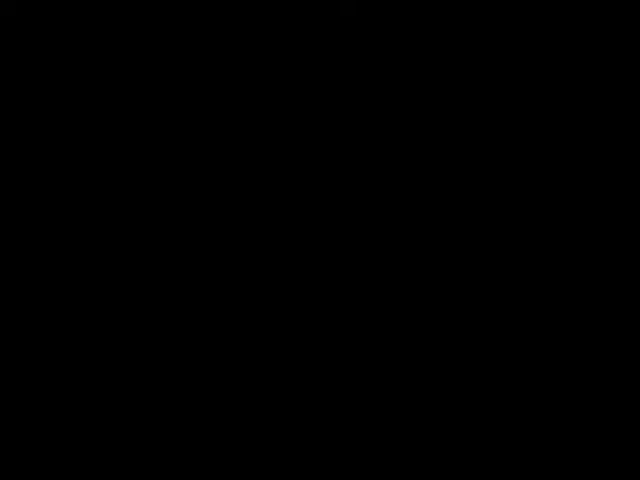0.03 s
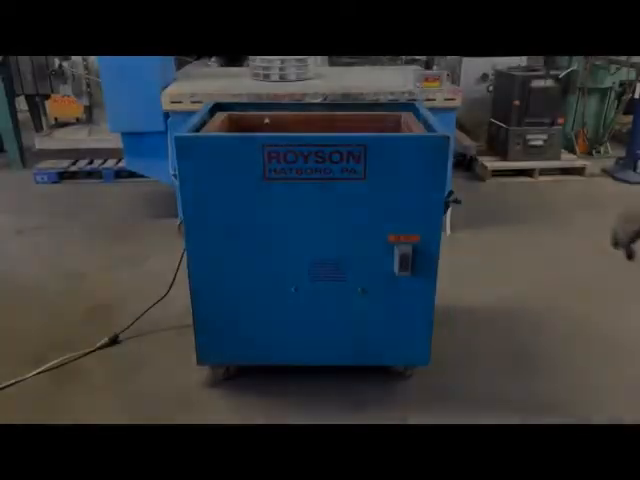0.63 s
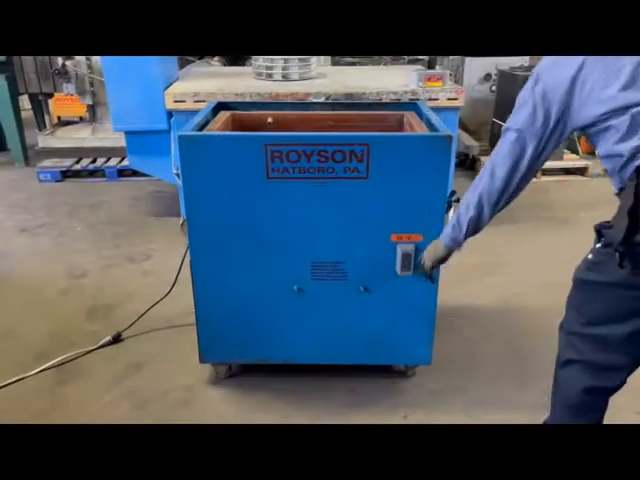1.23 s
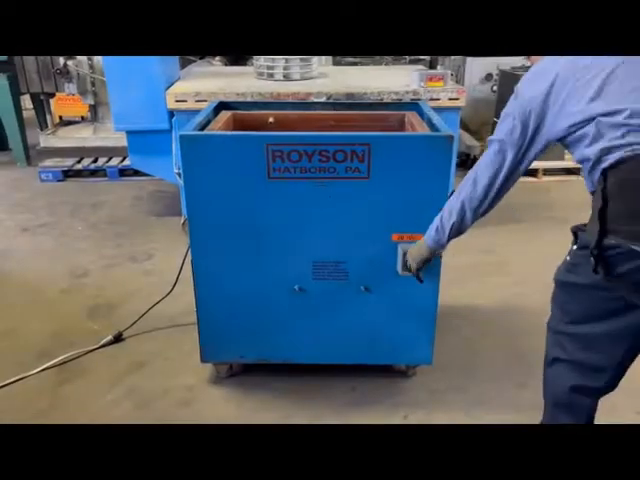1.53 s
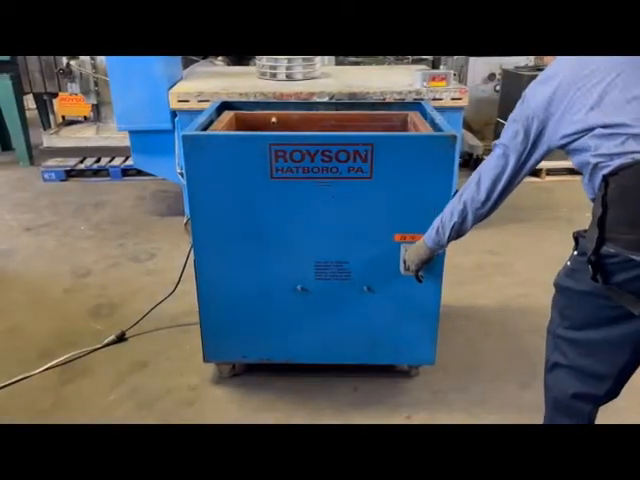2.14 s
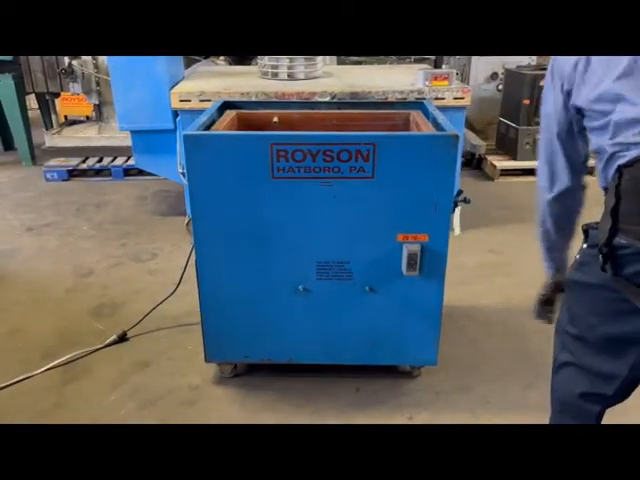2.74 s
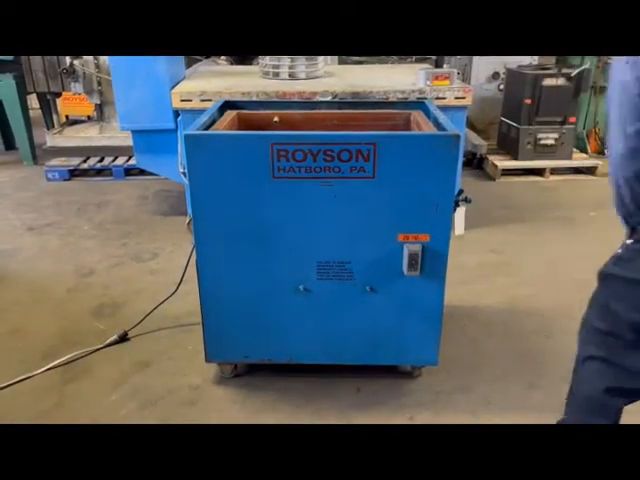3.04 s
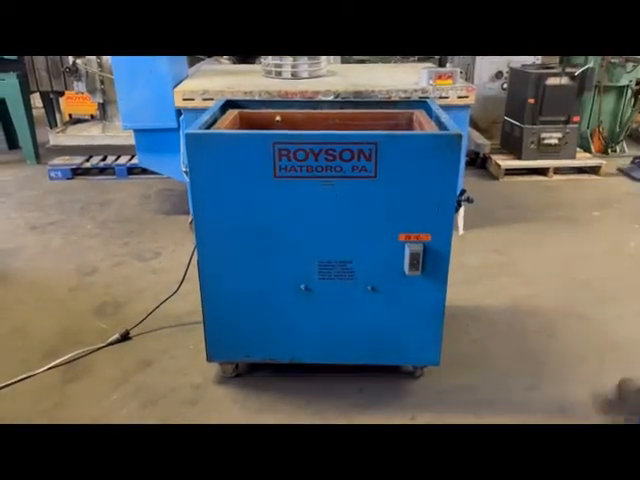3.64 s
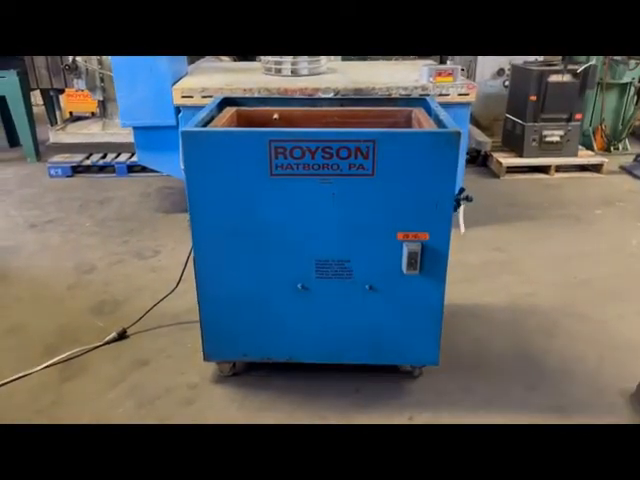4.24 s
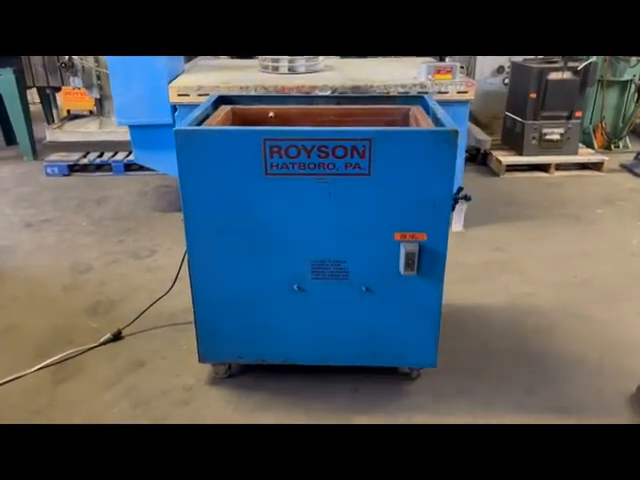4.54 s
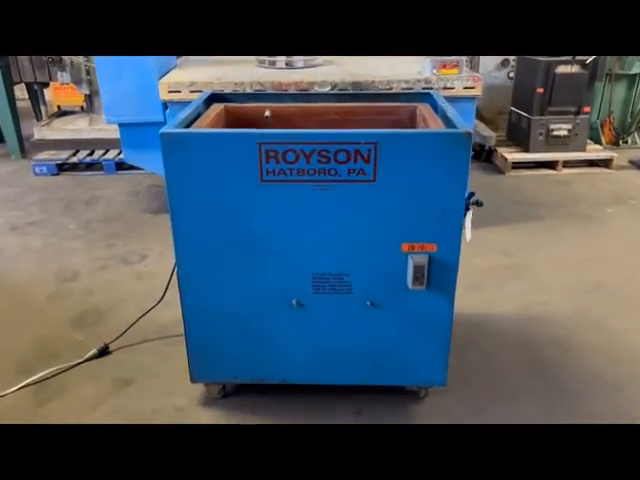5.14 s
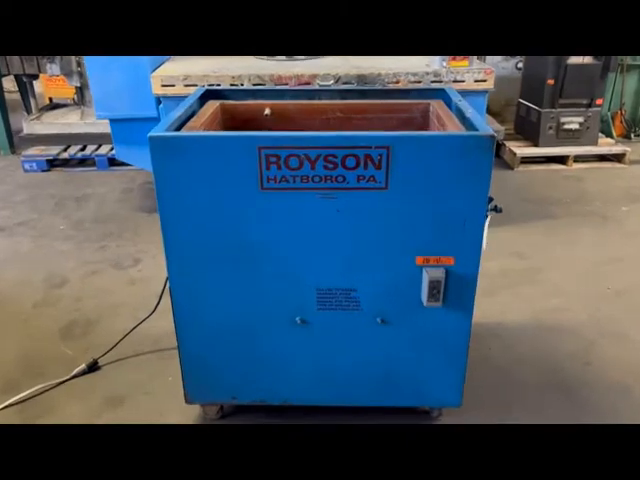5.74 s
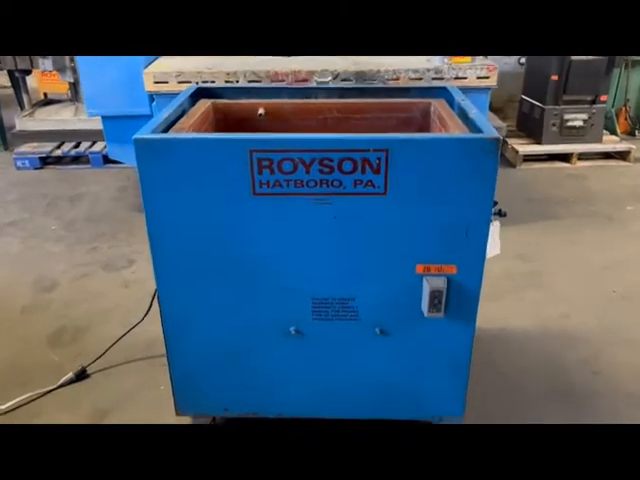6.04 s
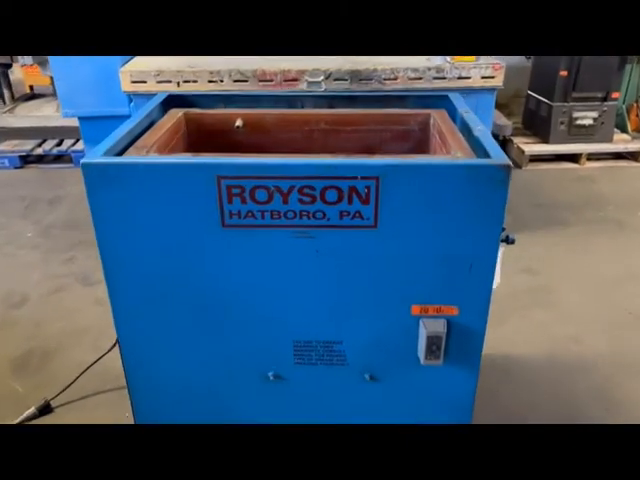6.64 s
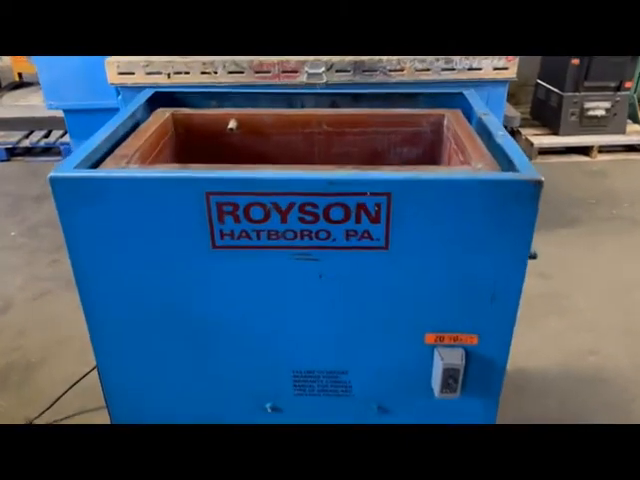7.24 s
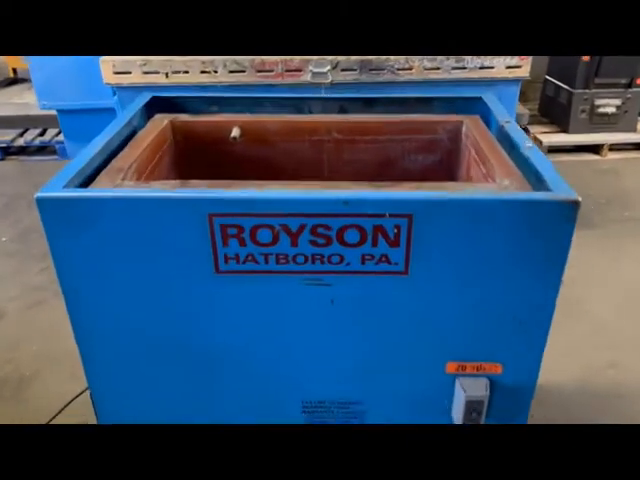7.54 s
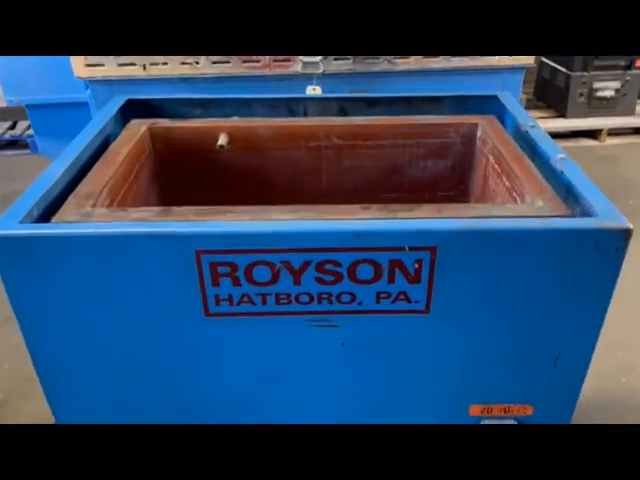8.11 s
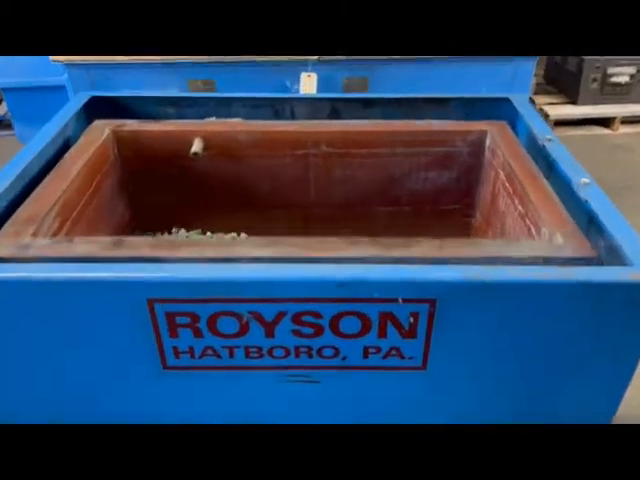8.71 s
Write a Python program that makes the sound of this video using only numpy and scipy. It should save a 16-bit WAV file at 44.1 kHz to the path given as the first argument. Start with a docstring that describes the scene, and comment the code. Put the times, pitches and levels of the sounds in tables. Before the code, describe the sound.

In a concrete workshop, low ventilation and a few gritty footsteps give way to the sharp clack of a switch. A vibrating tub machine starts with a rising growl and a surge of booms and knocks, then runs steadily, humming and drumming on its steel cabinet. Its load rattles in a fast pulse, getting louder and crisper as the microphone approaches from a couple of metres away.

```python
"""Shoes scuff over the ventilation of a concrete workshop. A starter snaps, and 2.3 m from a stereo
microphone pair the motor of a tub vibratory finisher growls up to speed; the tub knocks and booms through
its spring resonance. Running steadily, its eccentric weight makes it hum, rock once in five turns and
drum on its steel cabinet, while the load is thrown up and rattles down once a turn, ever more distinctly
as the microphones are walked in to 0.8 m."""
import sys
import numpy as np
from scipy import signal
from scipy.fft import rfft, irfft, next_fast_len
from scipy.io import wavfile
from scipy.ndimage import uniform_filter1d

SR = 44100
rng = np.random.default_rng(int(sys.argv[2]) if len(sys.argv) > 2 else 0)


def output_pcm(signal):
    """Save a mono or channel-first signal as 16-bit PCM at the path in sys.argv[1].

    Samples are clipped to [-1, 1] before scaling.
    """
    pcm = np.clip(np.atleast_2d(signal).T, -1, 1) * 32767
    wavfile.write(sys.argv[1], SR, np.round(pcm).astype(np.int16))


N = 395577
TIME = np.arange(N) / SR

# strongest harmonic and its rocking sidebands: f/shaft speed, level/dB
THROB_PARTIALS = [(2.8, -5), (3, 0), (3.2, -17)]
# cabinet hum: f/shaft speed (played at the nearest 0.2), level/dB, gain per halving of distance/dB
HUM_PARTIALS = [(1, -22, 4), (2, -10, -0.5), (4, -4.5, -2.5), (5, -10, 1), (6, -12.5, 2.5), (7, -9.5, -1),
                (10, -11, -4), (11, -3.5, -2.5), (11.4, -17, 2.5), (11.6, -14, 1.5), (12, -20, 4),
                (13, -19.5, 5.5), (13.865, -14, 5), (15.18, -11.5, -2), (16.98, -21.5, 5.5),
                (17.6, -20, 6.5), (19.38, -22, 4.5), (20.14, -16.5, 1.5), (23.54, -16, -2),
                (29.37, -13, -9), (30.56, -16.5, -9)]
# ringing cabinet panels: f/Hz, width/Hz, level/dB
PANEL_MODES = [(326.9, 7, 11), (343, 16, 1.5), (408, 16, -4), (454, 18, -2), (510, 25, -12.5),
               (699, 38, -4.5), (867, 28, -1), (974, 22, -5), (1286, 17, -8), (2425, 59, 4)]
# broad spectra of the tub, the cabinet and the load: f/Hz, level/dB
TUB_SPECTRUM = [(25, -33), (45, -14), (70, -3.5), (105, 1.5), (150, -4), (195, -3), (255, 2.5), (310, -9.5),
                (420, -12.5), (700, -57), (2000, -75), (16000, -110)]
CABINET_SPECTRUM = [(180, -15.5), (300, -8), (420, -1.5), (560, -0.5), (780, -5.5), (1150, -4.5),
                    (1600, -11), (2400, -18.5), (4000, -21.5), (8000, -54), (16000, -85)]
LOAD_SPECTRUM = [(500, -15), (1200, -3), (2000, -3.5), (3200, -4), (5000, 0.5), (7000, 3.5), (9000, 2.5),
                 (11500, -2), (14300, -6.5), (15500, -39)]
# single swings slide the load before it lifts off: t/s, level/dB
LOAD_SLIDES = [(2.48, -53), (2.606, -30), (2.765, -48)]
# the load lands in one clump: t/s, level/dB
CLUMP_LANDINGS = [(2.742, -34), (2.803, -32), (2.871, -23.5), (2.9255, -21), (2.971, -28), (3.068, -29),
                  (3.111, -21), (3.156, -22), (8.543, -16), (8.946, -16)]
# the tub's boom: f/Hz, width/Hz, level/dB, lag behind the swing/s
TUB_MODES = [(78.8, 10, -7, 0.12), (102, 10.7, -6, 0.05), (115, 50, -8, 0.0), (240, 16, -9.5, .09),
             (262, 16, -11.5, .14), (297, 30, -13.5, .1), (327, 14, -11, .13), (349, 19, -14, .07)]
# the tub bottoms on its springs: t/s, level/dB, f/Hz
SPRING_BUMPS = [(2.576, -21.5, 110), (2.931, -14.5, 135), (3.021, -17.5, 323), (3.058, -15, 159),
                (3.168, -18.5, 120), (3.247, -19, 125), (3.37, -18, 250), (3.423, -16, 130)]
# motor housing resonances: f/Hz, width/Hz, level/dB
MOTOR_MODES = [(328, 55, -5.5), (477, 49, -2), (567, 39, 0), (755, 46, -9), (880, 43, 1.5), (1034, 37, 3.5),
               (1124, 42, -2), (1300, 32, -10)]
# housing groans: centre t/s, half-length/s, f/Hz, level/dB
HOUSING_GROANS = [(2.265, 0.06, 366, -34), (2.37, .07, 290, -39), (2.53, 0.083, 368, -32.5),
                  (2.44, 0.081, 552, -43), (2.46, .06, 446, -41), (2.68, .05, 350, -29),
                  (2.79, 0.1, 565, -35), (2.96, .05, 498, -36), (2.74, 0.075, 1040, -32),
                  (3.14, 0.17, 1115, -34)]
# buzz of the starting current: f/Hz, level/dB
MAINS_PARTIALS = [(240, -6), (360, -2.5)]
# the starter's steel box: f/Hz, level/dB, t60/s
STARTER_MODES = [(330, 6, 0.36), (654, 2, 0.32), (1197, 11, 0.2), (1510, 10, 0.11), (1626, 1, 0.23),
                 (2305, 6, .2), (2552, -3, 0.25), (2850, 1, .15), (3030, 1, .17), (4420, 1, .2),
                 (4737, -3, .2), (5330, 2, .13)]
# snap of its contacts: f/Hz, level/dB
SNAP_SPECTRUM = [(100, -16), (350, -6), (800, -6.5), (1500, -4), (2600, 1), (3800, -5), (5300, 0.5),
                 (8000, -1.5), (11000, -5), (16000, -26)]
# scuffs on the floor: t/s, level/dB, decay/s, rasp f/Hz
SHOE_SCUFFS = [(0.309, -44, 0.016, 1380), (0.655, -66, .045, 4600), (0.67, -67, .03, 2500),
               (0.878, -48, .0045, 1450), (0.93, -56, .008, 1650), (0.978, -56, .006, 1600),
               (1.342, -35, 0.005, 1300), (1.354, -40, 0.017, 2900), (1.368, -38.5, 0.018, 4200),
               (1.401, -40, .005, 1900)]
# grit under a sole: f/Hz, level/dB
GRIT_SPECTRUM = [(300, -18), (950, -2), (1350, 2), (1900, -1.5), (2800, -5), (4400, -4.5), (6000, -14),
                 (10000, -19), (16000, -28)]
# a sole's squeak: t/s, f/Hz, level/dB
SQUEAK_GLIDE = [(1.343, 1407, -46), (1.36, 1524, -49), (1.377, 1830, -45), (1.39, 1915, -50),
                (1.403, 2020, -47), (1.412, 2060, -56)]
# room tone, its noise and its steady tones: f/Hz, level/dB
ROOM_SPECTRUM = [(15, -32), (35, -11), (70, -4.5), (130, -8), (200, -13.5), (290, -16), (450, -23),
                 (750, -26), (1500, -31.5), (3000, -44.5), (5200, -53), (8500, -68), (11000, -72),
                 (15000, -77)]
ROOM_TONES = [(72.3, -50), (60.4, -44.5), (605, -62), (5087, -85)]
# workshop reverberation: f/Hz, t60/s
ROOM_DECAY = [(100, 0.95), (1000, 0.53), (4000, 0.68), (8000, 0.17), (16000, 0.44)]
# diffuse sound at the microphone pair: f/Hz, left-right coherence/0..1
MIC_COHERENCE = [(60, .995), (130, .97), (250, .9), (500, .68), (1000, .58), (1500, .3), (2000, .58),
                 (3300, .15), (7000, .2), (8300, .9), (10000, .6), (12000, .9), (15000, .6)]
# left microphone against right: f/Hz, phase lead/rad
MIC_PHASE = [(0, 0), (520, 0.33), (1890, 0.3), (3010, 1), (3790, 0.62), (4820, 0.5), (5770, -1.5),
             (6630, -1), (7670, -2.5), (8870, -3.5), (11100, -6), (12900, -5.5), (14600, -11),
             (15300, -6.5)]
# left microphone against right: f/Hz, level/dB
MIC_BALANCE = [(60, 2), (110, -0.5), (200, 2), (380, 2), (700, 0.0), (1290, -1), (2380, 1), (4400, 4.5),
               (8120, -1), (15000, 0.5)]

# running level from afar/dB, gain in the surge/dB, surge release/s, gain per halving of distance/dB
TUB_LEVEL = (-27.5, 4, 0.7, 0.1)
CABINET_LEVEL = (-27.5, 3.5, 0.25, 2.5)
LOAD_LEVEL = (-27, 1, 1, 5)
BOOM_LEVEL = (-42, 23, 0.74, -3.5)
HUM_LEVEL = (-30.5, 0, 2, 4)

START_S, CREST_S = 2.12, 8.816   # motor on; one crest of the rocking
SPIN_UP_TURNS_PER_S2, RUNNING_TURNS_PER_S = 23.7, 29.69
SWING_S, SWING_RISE_S, TREMBLE_DB = 2.52, 0.032, -15.5   # the tub only trembles until it swings free
LATE_FROM_S, LATE_TURNS = 5.42, .35   # from then on the rattle's pulse falls about a third of a turn later
WALK_S, WALK_M_PER_S, FAR_M, NEAR_M = 4.84, 0.44, 2.315, 0.82   # microphones approach the tub


def hum(turns, near, waver_db=1.3, waver_per_s=5, stray_turns=.008, jitter_turns=.0035):
    """The eccentric weight drives the panels at its harmonics; rocking makes the strongest throb."""
    throb = sum(from_db(db) * np.cos(2 * np.pi * order * turns) for order, db in THROB_PARTIALS)
    panels = 0
    for order, db, halving_db in HUM_PARTIALS:
        # the panels lag the shaft unevenly: slowly, and from turn to turn
        lag = stray_turns * wander(waver_per_s) + jitter_turns * wander(RUNNING_TURNS_PER_S)
        phase = np.round(order * 5) / 5 * (turns + lag) + rng.random()   # fifths come from the rocking
        gain = from_db(db + halving_db * near + waver_db * wander(waver_per_s))
        panels = panels + gain * np.cos(2 * np.pi * phase)
    return np.sqrt(2) * (from_db(-0.55 - 0.1 * near) * throb + panels)


def drumming(turns, echoes, tub_db, cabinet_db):
    """Heavy knocks shake the tub; lighter ones ring the cabinet's sheet steel."""
    heavy = scattered(knocks(turns, count=110, vary_db=2.5, loose=.2), echoes, direct_db=4)
    light = scattered(knocks(turns, count=400, vary_db=3, loose=.5), echoes, direct_db=-2.5)
    tub = even(colour(heavy, TUB_SPECTRUM))
    cabinet = even(colour(light + ring_modes(light, PANEL_MODES), CABINET_SPECTRUM))
    return from_db(tub_db) * tub + from_db(cabinet_db) * cabinet


def knocks(turns, count, vary_db, loose, jitter_s=.0003):
    """Tub, springs and frame touch in a five-turn pattern; a loose share strays by up to a turn."""
    rounds = np.arange(np.floor(turns[0] / 5), 2)[:, None]
    at_turn = 5 * (rounds + rng.random(count))
    size = rng.choice([-1, 1], count) * from_db(vary_db * rng.standard_normal(at_turn.shape))
    at_turn += (rng.random(at_turn.shape) < loose) * rng.uniform(-1, 1, at_turn.shape)
    when = np.interp(at_turn, turns, TIME, left=-1, right=-1)
    when += jitter_s * rng.standard_normal(when.shape)
    heard = (when > START_S) & (when < TIME[-1])
    return np.bincount((when[heard] * SR).astype(int), size[heard], N)


def rattle(turns, echoes, direct_db, rise_turns=.115, fall_turns=.21, clicks_per_s=13000,
           clacks_per_s=2600):
    """Once a turn the load lands as a shower of clicks that thins out until the next throw."""
    throw = turns + .43 + LATE_TURNS * (TIME < LATE_FROM_S) + .025 * wander(RUNNING_TURNS_PER_S)
    throw_index = (np.floor(throw) - np.floor(throw.min())).astype(int)
    phase = throw % 1 - .4
    landing = np.exp(-(phase / np.where(phase < 0, rise_turns, fall_turns)) ** 2)
    shower = 0.05 + landing
    strength = from_db(0.83 * rng.standard_normal(throw_index.max() + 1))[throw_index]
    sizes = rng.standard_normal(N) * from_db(0.6 * np.minimum(rng.exponential(1, N), 3))
    hits = rng.random(N) < clicks_per_s * np.sqrt(shower) / SR
    clicks = hits * sizes * strength * shower ** (1 / 4)
    # at the height of the landing, some pieces clack hard against the tub wall
    hard_hits = (rng.random(N) < clacks_per_s * landing ** 3 / SR) * np.sign(sizes) * strength
    clacks = from_db(9) * resonate(hard_hits, hz=2400, width_hz=2150)
    # the walls give back less of the top, so the finest ticks arrive most directly
    wet = scattered(clicks, echoes, direct_db=-40)
    wet = 0.58 * cut(wet, 7500) + 0.78 * wet
    steel_ring = from_db(2 * wander(7)) * resonate(wet, hz=2436, width_hz=100)
    return even(colour(from_db(direct_db) * (clicks + clacks) + wet + steel_ring, LOAD_SPECTRUM))


def thrown_share(speed, lift_off_turns_per_s=18.4):
    """The part of the load, 0 to 1, that leaves the tub floor on each turn."""
    return 1 / (1 + np.exp(lift_off_turns_per_s - speed))


def slides(rise_s=0.039, fall_s=0.072):
    """Gain of the load's first slides: each gathers quickly and trickles out."""
    return sum(from_db(db) * np.exp(-np.where(TIME < s, ((TIME - s) / rise_s) ** 2, (TIME - s) / fall_s))
               for s, db in LOAD_SLIDES)


def clatters(echo, decay_s=0.0074):
    """A clump of the load hits the tub wall at once."""
    pieces = colour(rng.standard_normal(N), LOAD_SPECTRUM)
    pieces = rms_one(pieces + from_db(4) * resonate(pieces, hz=3000, width_hz=1800))
    envelope = sum(from_db(db) * burst(s, decay_s) for s, db in CLUMP_LANDINGS)
    return in_room(pieces * envelope, echo, direct_db=12)


def spring_surge(release_s, start_s=2.92, attack_s=0.064, hold_s=0.39):
    """The tub swings wide, 0 to 1, as the shaft passes the spring resonance, then settles."""
    attack = np.clip((TIME - start_s) / attack_s, 0, 1)
    return attack * np.exp(-np.maximum(TIME - start_s - attack_s - hold_s, 0) / release_s)


def booming(boom_db):
    """The tub booms on its springs, each resonance following the swing with its own lag."""
    swing = from_db(boom_db) + sum(from_db(db) * burst(s, 0.015) for s, db, _ in SPRING_BUMPS)
    jolts = diffuse_noise()
    boom = 0
    for hz, width, db, lag in TUB_MODES:
        mode = even(resonate(resonate(jolts, hz, width), hz, width))
        boom = boom + from_db(db) * np.interp(TIME - lag, TIME, swing) * mode
    return boom


def bumps(echo, decay_s=0.014, overtone_ratio=1.7):
    """Each time the tub bottoms on its springs it gives a dull, hard knock."""
    thumps = 0
    for s, db, hz in SPRING_BUMPS:
        angle = 2 * np.pi * hz * (TIME - s)
        tone = np.sin(angle) + from_db(-5) * np.sin(overtone_ratio * angle)
        thumps = thumps + from_db(db + 4.02) * burst(s, decay_s) * tone
    return in_room(thumps, echo, direct_db=6)


def motor(turns, speed, echo, slots=42, rough_hz=100):
    """Starting current buzzes; a rough rotor whine climbs through the housing's resonances."""
    flutter = cut(rng.standard_normal((3, N)), rough_hz)
    sidebands = 2 * np.pi * np.array([[-120], [0], [120]]) * TIME
    slot_angle = 2 * np.pi * slots * turns
    partials = np.cos(slot_angle + sidebands) + from_db(-11) * np.cos(2 * slot_angle + sidebands)
    whine = cut(np.sum(flutter * partials, axis=0), 300, "high")   # the housing radiates little bass
    whine = even(from_db(-16) * whine + ring_modes(whine, MOTOR_MODES))
    whine *= np.minimum(0.45 + speed / 14, 1)
    buzz = sum(from_db(db + 1.5 * wander(29.9)) * sine(hz, 0.5 * wander(30)) for hz, db in MAINS_PARTIALS)
    buzz *= from_db(-4 - 1.5 * np.maximum(speed - 11, 0))
    return even(in_room(whine, echo, direct_db=1) + buzz)


def motor_effort(speed, full_turns_per_s=12, ease_off_s=3.03, ease_db_per_s=23):
    """Gain of the growl: it grows with speed and dies away once the work of starting is done."""
    stalled = np.maximum(1 - speed / full_turns_per_s, 0)
    return from_db(-26 - 15 * stalled - ease_db_per_s * np.maximum(TIME - ease_off_s, 0))


def groans(waver_db=1.5, waver_per_s=31):
    """The motor housing sings out in short, wavering tones at set moments of the run-up."""
    tones = 0
    for s, reach_s, hz, db in HOUSING_GROANS:
        swell = from_db(db + waver_db * wander(waver_per_s)) * np.exp(-((TIME - s) / reach_s) ** 4)
        tones = tones + swell * sine(hz, wander(waver_per_s) / 2)
    return tones


def starter(echo, close_s=2.121, ring_s=2.1215, split_hz=17):
    """The starter snaps shut and chatters; its box rings and the panel behind twangs and thuds."""
    chatter = from_db(-16) * burst(close_s, 0.042)
    contact = (burst(close_s, 0.007) + chatter) * ramp(close_s, 0.001)
    snap = rms_one(colour(rng.standard_normal(N), SNAP_SPECTRUM)) * contact
    ring = 0
    for hz, db, t60 in STARTER_MODES:
        for split in (-split_hz, split_hz):   # each mode is a pair of close partials
            phase = (hz + split * rng.random()) * TIME + rng.random()
            ring = ring + from_db(db) * burst(ring_s, t60 / np.log(1000)) * np.sin(2 * np.pi * phase)
    rumble = resonate(resonate(rng.standard_normal(N), 290, 130), 290, 130)
    thud = rms_one(rumble) * burst(2.15, 0.075)
    panel = from_db(-20.5) * panel_twang(ring_s) + from_db(-29) * thud
    return in_room(from_db(-16) * snap + from_db(-40) * ring + panel, echo, direct_db=5.5)


def panel_twang(start_s, cycles=11, top_hz=3600, decay_s=0.012):
    """Bending waves cross the sheet steel, the high ones fastest: a ping that falls steeply."""
    age = np.maximum(TIME - start_s, 0)
    return burst(start_s, decay_s) * np.sin(2 * np.pi * cycles * np.log1p(age * top_hz / cycles))


def shoes(echo, rough_hz=130):
    """Soles catch on gritty concrete; in the last step one squeaks, rough and rising."""
    grit = rms_one(colour(rng.standard_normal(N), GRIT_SPECTRUM))
    scuffs = 0
    for s, db, decay_s, hz in SHOE_SCUFFS:
        rasp = from_db(-1.5) * rms_one(resonate(grit, hz, width_hz=450))
        scuffs = scuffs + from_db(db) * burst(s, decay_s) * rms_one(grit + rasp)
    s, hz, db = np.transpose(SQUEAK_GLIDE)
    angle = 2 * np.pi * np.cumsum(np.interp(TIME, s, hz)) / SR
    tone = np.sqrt(2) * (np.sin(angle) + from_db(-9) * np.sin(2 * angle))
    grip = rms_one(cut(rng.standard_normal(N), rough_hz))
    squeak = np.interp(TIME, s, from_db(db), left=0, right=0) * grip * tone
    return in_room(scuffs + squeak, echo, direct_db=5.5)


def room_tone(air_db=-41):
    """Ventilation and far machines, all around the microphones."""
    air = rms_one(colour(diffuse_noise(), ROOM_SPECTRUM))
    tones = sum(from_db(db) * sine(hz, 2 * np.pi * rng.random()) for hz, db in ROOM_TONES)
    return from_db(air_db) * air + tones


def workshop_echo(build_s=0.0088):
    """Stereo impulse response of the concrete room: dense echoes, each band with its own decay."""
    t, hz = TIME[:SR], np.arange(SR // 2 + 1)
    white = rfft(diffuse_noise()[:, :SR])
    tail = 0
    for band_hz, t60 in ROOM_DECAY:
        band = at_hz([(f, f == band_hz) for f, _ in ROOM_DECAY], hz)
        tail = tail + irfft(white * band, SR) * from_db(-60 * t / t60)
    tail *= np.clip(t / build_s, 0, 1)
    return tail / np.sqrt(np.sum(tail ** 2) / 2)


def in_room(x, echo, direct_db):
    """Direct sound, direct_db above its echoes, at constant total power."""
    direct = from_db(direct_db)
    return (direct * x + signal.fftconvolve(x[None], echo, axes=1)[:, :N]) / np.sqrt(1 + direct ** 2)


def scattered(clicks, echoes, direct_db):
    """Each click comes from one of several places on the machine, each with its own echoes."""
    place = rng.integers(0, len(echoes), N)
    return sum(in_room(clicks * (place == k), echo, direct_db) for k, echo in enumerate(echoes))


def diffuse_noise():
    """Noise from all sides as the microphone pair hears it, alike in the bass."""
    mid = filtered(rng.standard_normal(N), lambda hz: np.sqrt((1 + at_hz(MIC_COHERENCE, hz)) / 2))
    side = filtered(rng.standard_normal(N), lambda hz: np.sqrt((1 - at_hz(MIC_COHERENCE, hz)) / 2))
    return np.array([mid + side, mid - side])


def from_db(db):
    return 10 ** (np.asarray(db) / 20)


def rms_one(x):
    return x / np.sqrt(np.mean(x ** 2) + 1e-20)


def even(x):
    """Hold the centre signal at unit level; quick beats stay."""
    power = uniform_filter1d(np.atleast_2d(x).mean(axis=0) ** 2, size=7400)
    return x / np.sqrt(np.abs(power) + 1e-4 * np.mean(x ** 2))


def sine(hz, phase):
    """A tone of unit RMS."""
    return np.sqrt(2) * np.sin(2 * np.pi * hz * TIME + phase)


def ramp(start_s, rise_s):
    return np.clip((TIME - start_s) / rise_s, 0, 1)


def burst(start_s, decay_s):
    """Sudden onset, exponential decay."""
    return (TIME >= start_s) * np.exp(-np.clip((TIME - start_s) / decay_s, 0, 50))


def wander(per_s):
    """Random drift with a spread of about 1."""
    return np.interp(TIME * per_s, np.arange(600), rng.standard_normal(600))


def at_hz(points, hz):
    f, value = np.transpose(points)
    return np.interp(np.log(hz + 1), np.log(f + 1), value)


def filtered(x, response):
    """Apply a frequency response, given as a function of Hz."""
    size = next_fast_len(N + 8192, real=True)
    return irfft(rfft(x, size) * response(np.arange(size // 2 + 1) * SR / size), size)[..., :N]


def colour(x, spectrum):
    return filtered(x, lambda hz: from_db(at_hz(spectrum, hz)))


def cut(x, hz, passes="low"):
    return signal.sosfilt(signal.butter(2, hz, passes, fs=SR, output="sos"), x)


def resonate(x, hz, width_hz):
    """A resonance with peak gain 1."""
    r = np.exp(-np.pi * width_hz / SR)
    feedback = [1, -2 * r * np.cos(2 * np.pi * hz / SR), r * r]
    return signal.lfilter(np.array([1, 0, -1]) * (1 - r * r) / 2, feedback, x + 1e-18)


def ring_modes(x, modes):
    return sum(from_db(db) * resonate(x, hz, width) for hz, width, db in modes)


def scene():
    """The shaft times hum, drumming and rattle; speed, surge and microphone distance set the levels."""
    echoes = [workshop_echo() for _ in range(4)]
    speed = np.clip(SPIN_UP_TURNS_PER_S2 * (TIME - START_S), 0, RUNNING_TURNS_PER_S)
    turns = np.cumsum(speed) / SR
    turns -= np.interp(CREST_S, TIME, turns)
    distance_m = np.clip(FAR_M - WALK_M_PER_S * (TIME - WALK_S), NEAR_M, FAR_M)
    near = np.log2(FAR_M / distance_m)   # halvings of the distance
    tub_db, cabinet_db, load_db, boom_db, hum_db = [
        steady_db + surge_db * spring_surge(release_s) + halving_db * near
        for steady_db, surge_db, release_s, halving_db
        in (TUB_LEVEL, CABINET_LEVEL, LOAD_LEVEL, BOOM_LEVEL, HUM_LEVEL)]
    held_db = TREMBLE_DB * (1 - ramp(SWING_S, SWING_RISE_S))
    force = (speed / RUNNING_TURNS_PER_S) ** 2   # pull of the eccentric weight
    load = rattle(turns, echoes, direct_db=-5.6 + 8 * near)   # drier close up
    machine = (drumming(turns, echoes, tub_db + held_db, cabinet_db + held_db)
               + booming(boom_db) + bumps(echoes[3])
               + from_db(hum_db) * force * hum(turns, near)
               + motor_effort(speed) * motor(turns, speed, echoes[0]) + groans()
               + (from_db(load_db) * thrown_share(speed) + slides()) * load + clatters(echoes[2]))
    return ramp(START_S, 0.016) * machine + starter(echoes[1]) + shoes(echoes[2]) + room_tone()


def record(dry):
    """The microphones differ in phase and level; the sound fades in, peaks round off, the top is cut."""
    def microphones(hz):
        lead = np.interp(hz, *np.transpose(MIC_PHASE))
        left = from_db(at_hz(MIC_BALANCE, hz) / 2) * np.exp(1j * lead / 2)
        return np.array([left, 1 / left])
    faded = filtered(dry, microphones) * ramp(start_s=0.074, rise_s=0.65)
    top_cut = signal.ellip(12, .1, 90, 15800, fs=SR, output="sos")
    return signal.sosfilt(top_cut, np.tanh(faded))


dry = scene()
out = record(dry)
output_pcm(out)
```